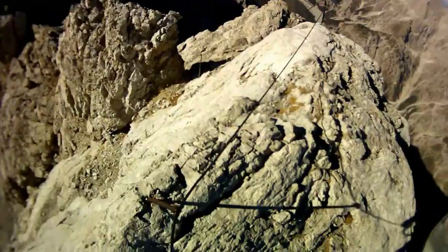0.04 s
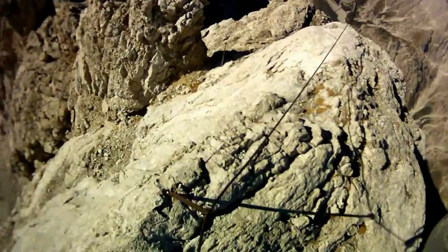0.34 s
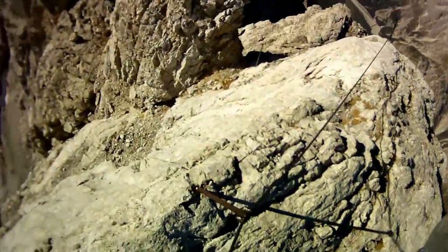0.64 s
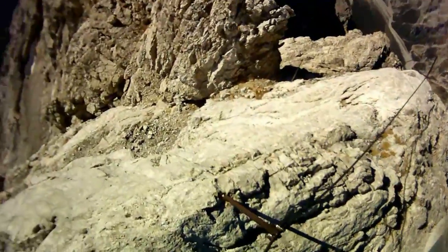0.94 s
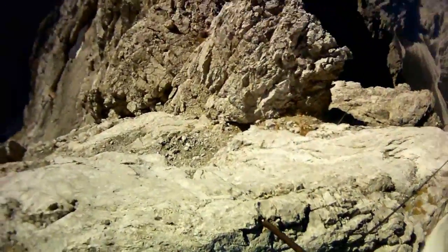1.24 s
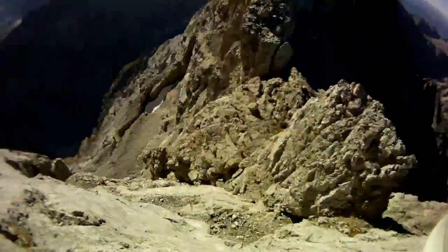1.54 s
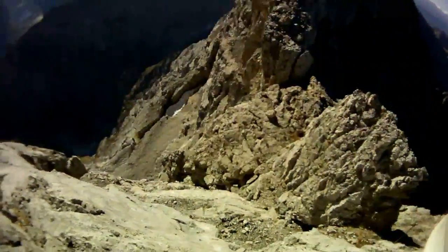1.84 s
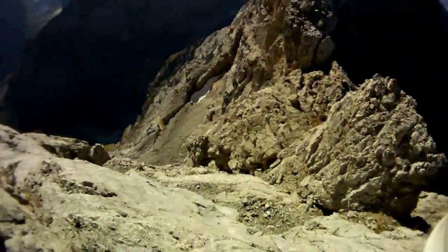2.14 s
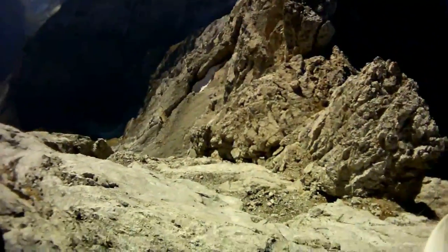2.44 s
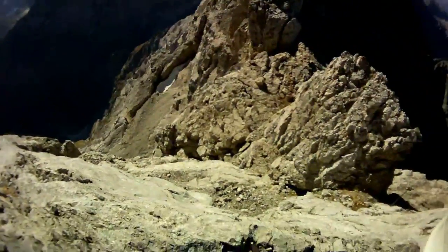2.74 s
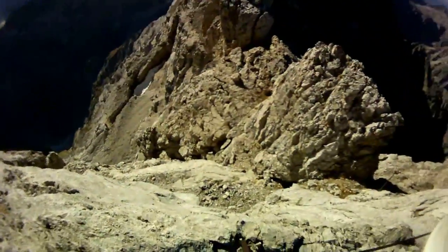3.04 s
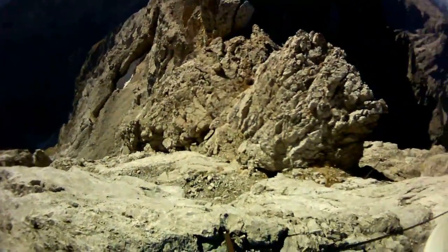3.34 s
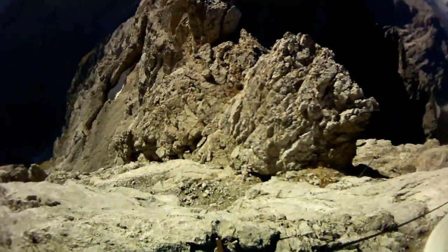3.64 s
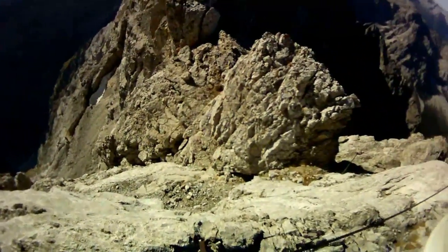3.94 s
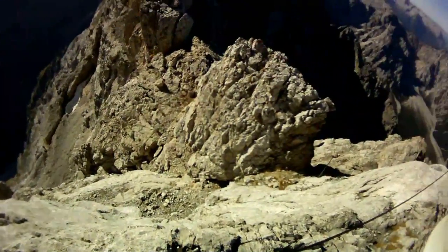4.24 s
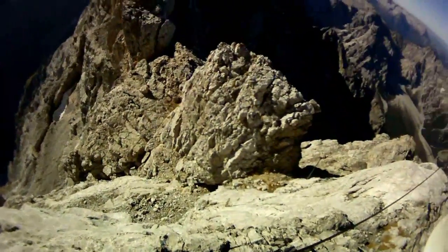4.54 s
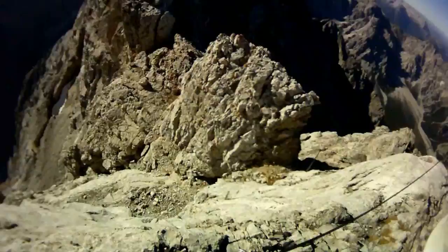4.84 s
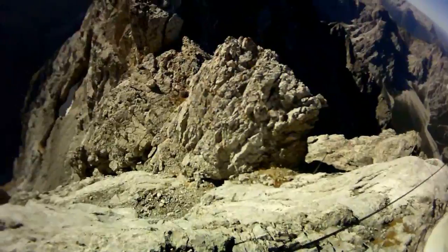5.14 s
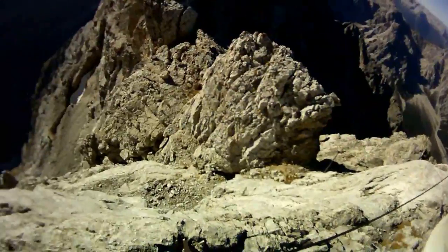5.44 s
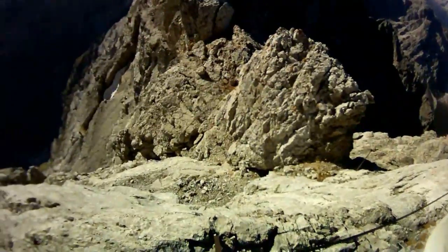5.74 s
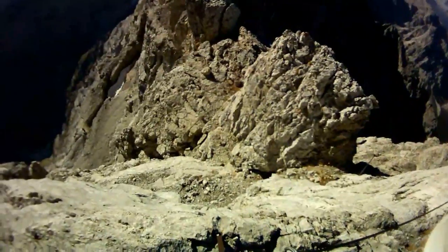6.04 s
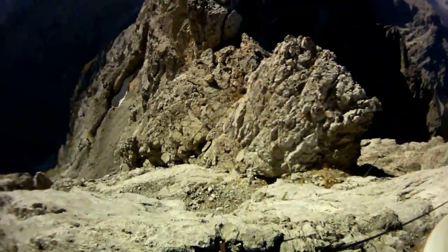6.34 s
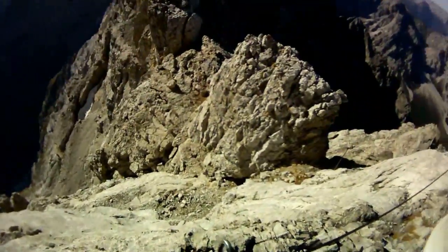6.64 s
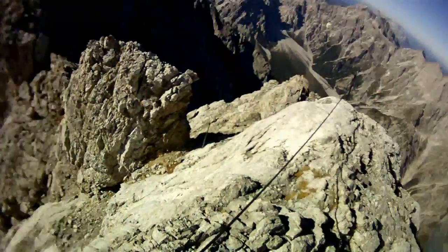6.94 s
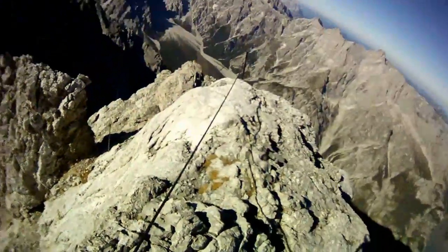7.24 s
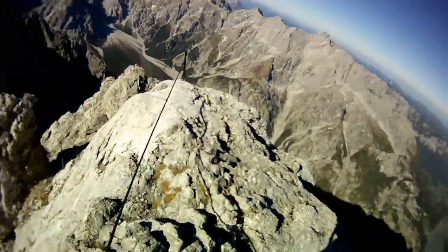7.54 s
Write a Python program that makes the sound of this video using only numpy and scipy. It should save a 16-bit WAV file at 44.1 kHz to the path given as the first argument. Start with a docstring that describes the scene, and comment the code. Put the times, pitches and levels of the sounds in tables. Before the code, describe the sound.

Wind buffets the microphone as carabiners scrape and clank sharply on a steel cable, with scuffs on rock and small gear ticks.

```python
"""A windy limestone ridge, the microphone close on a climber clipped to a fixed steel cable.
From the start gusts buffet the microphone, clothing and soles rustle on the rock and carabiners clank.
After two seconds they scrape along the cable and strike each other and its anchor; near 2.8 s the hardest
clanks overload the recorder. Then the wind eases and the cable hums briefly. From five seconds on,
gear right beside the microphone ticks and creaks as the head turns."""
import sys
import numpy as np
from scipy import signal
from scipy.fft import rfft, irfft, next_fast_len
from scipy.io import wavfile
from scipy.ndimage import uniform_filter1d, minimum_filter1d

SR = 44100
rng = np.random.default_rng(int(sys.argv[2]) if len(sys.argv) > 2 else 0)


def store_pcm(level_fs):
    """Save levels as 16-bit WAV."""
    pcm = np.round(np.clip(level_fs, -1, 1) * 32767).astype(np.int16)
    wavfile.write(sys.argv[1], SR, np.atleast_2d(pcm).T)


N = 339072
T = np.arange(N) / SR
BLOW = T[:SR // 3]   # seconds within one blow


def from_db(db):
    return 10 ** (np.asarray(db) / 20)


def rms_one(x):
    return x / np.sqrt(np.mean(x ** 2) + 1e-20)


def add(out, start, sound):
    """Mix a sound in, start in seconds."""
    at = max(round(start * SR), 0)
    out[at:at + len(sound)] += sound[:N - at]


def drift(per_s):
    """A random wander with rms 1."""
    knots = rng.standard_normal(4096)
    return rms_one(np.interp(T * per_s, np.arange(len(knots)), knots))


def swells(rows, attack_s, release_s):
    """Gain over time: each swell rises, holds and dies away."""
    gain = np.zeros(N)
    for start, length, db in rows:
        rise = np.clip((T - start) / attack_s, 0, 1)
        fall = np.exp(-np.clip((T - start - length) / release_s, 0, 20))
        gain += from_db(db) * rise * fall
    return gain


def coloured(x, spectrum):
    """Causal (minimum-phase) filter through (Hz, dB) points."""
    size = next_fast_len(len(x) + 2048, True)
    hz, db = np.transpose(spectrum)
    bins = np.maximum(np.arange(size // 2 + 1) * SR / size, 1)
    gain = from_db(np.interp(np.log(bins), np.log(hz), db))
    cepstrum = irfft(np.log(gain), size)
    cepstrum[1:size // 2] *= 2
    cepstrum[size // 2 + 1:] = 0
    return irfft(rfft(x, size) * np.exp(rfft(cepstrum)), size)[:len(x)]


def brightened(spectrum, treble_db, shelf_hz=4000):
    """A harder contact lifts the treble like a shelf."""
    return [(hz, db + treble_db / (1 + (shelf_hz / hz) ** 6)) for hz, db in spectrum]


def friction(per_s, spread_db):
    """Tiny slips of uneven size at random moments."""
    sizes = from_db(spread_db * np.minimum(rng.exponential(1, N), 4)) * rng.choice([-1, 1], N)
    return rms_one(sizes * (rng.random(N) < per_s / SR))


def stroke(slips, start, length, spectrum):
    """A short swell of slips heard through a body; rms 1 over its length."""
    count = max(int(length * SR), 64)
    push = slips[int(start * SR):][:count] * signal.windows.tukey(count, .5)
    sound = coloured(np.pad(push, (0, 1024)), spectrum)
    return sound / np.sqrt(np.sum(sound ** 2) / count + 1e-20)


def ringing(modes):
    """Every touch excites each mode with a strength and sign of its own."""
    hz, db, t60 = np.transpose(modes)[:, :, None]
    strength = from_db(db + 3 * rng.standard_normal(hz.shape)) * rng.choice([-1, 1], hz.shape)
    return np.sum(strength * from_db(-60 * BLOW / t60) * np.sin(2 * np.pi * hz * BLOW), axis=0)


# The microphone's hiss in still air. Each row: frequency in Hz, relative level in dB.
HISS_COLOUR = [(18, -27.5), (30, -2), (168, -15), (237, -18), (606, -12), (747, -23), (897, -18),
               (2690, -19), (3590, -28), (5590, -22), (6540, -24), (10700, -21.5), (15500, -26)]
# Tones from the electronics. Each row: frequency in Hz, level in dB.
WHINE_TONES = [(5545, -79), (11090, -72)]


def noise_floor(hiss_db=-65.5):
    """Under everything lie still air, microphone hiss and a thin electronic whine."""
    whine = sum(np.sqrt(2) * from_db(db) * np.sin(2 * np.pi * hz * T) for hz, db in WHINE_TONES)
    hiss = rms_one(coloured(rng.standard_normal(N), HISS_COLOUR))
    return from_db(hiss_db) * hiss + whine


# Gusts crossing the ridge. Each row: time in seconds, relative level in dB.
GUSTS = [(0.0, -41), (0.04, -44), (0.13, -52), (0.43, -46.5), (0.49, -42.5), (0.58, -49), (0.73, -43),
         (1.22, -54), (1.28, -48), (1.95, -53), (2.25, -62.5), (2.55, -66), (2.72, -49), (2.96, -64),
         (3.1, -45), (3.4, -71), (3.66, -56), (3.7, -71), (3.85, -45.5), (3.94, -53), (4.05, -43.5),
         (4.52, -66), (4.63, -58.5), (4.82, -69), (5.01, -56.5), (5.18, -67), (5.42, -60), (5.82, -72.5),
         (6.32, -66.5), (6.42, -69), (6.57, -63.5), (6.64, -74), (7.13, -64), (7.24, -75), (7.58, -75.5),
         (7.69, -65)]
# Wind right on the microphone. Each row: frequency in Hz, relative level in dB.
WIND_COLOUR = [(15, -23.5), (25, 5), (82, -1), (123, -3), (162, -4), (300, -6), (375, -5), (585, -5.5),
               (743, -14.5), (961, -22.5), (1260, -22), (1500, -28), (1950, -61.5), (3300, -120)]


def wind(lumps_db=3, gain_db=2.5, edge_hz=850, bass_hz=130, bass_db=-7, rush_db=-19):
    """Eddies buffet the microphone port in lumps; light air rumbles, strong gusts also rush higher up."""
    gusts = from_db(np.interp(T, *np.transpose(GUSTS)))
    strength = gusts / gusts.max()
    eddies = coloured(rng.standard_normal(N), WIND_COLOUR)
    roar = rms_one(signal.sosfilt(signal.butter(4, edge_hz, fs=SR, output="sos"), eddies))
    bass = signal.sosfilt(signal.butter(1, bass_hz, fs=SR, output="sos"), roar)
    rush = coloured(rng.standard_normal(N), [(400, -20.5), (850, -2), (1500, -7.5), (3000, -30.5)])
    air = from_db(bass_db) * bass * strength ** .68 + (roar - bass) * strength
    air += from_db(rush_db) * rms_one(rush) * strength ** 2
    return gusts.max() * air * from_db(gain_db + lumps_db * drift(per_s=70))


# Rubbed stone and cloth, heard close. Each row: frequency in Hz, relative level in dB.
RUB_COLOUR = [(760, -37), (1300, -11), (2260, -3), (2610, -4), (2980, -1.5), (4350, -2.5), (5790, -9),
              (6750, -5), (9270, -14), (12700, -15), (15000, -26.5)]
# The climber brushing the rock. Each row: start in seconds, length in seconds, level in dB.
RUBS = [(.02, 0.13, -59), (.68, 0.44, -56.5), (1.72, .2, -52.5), (2.17, 0.17, -57), (2.37, 0.077, -49),
        (2.47, .11, -52.5), (2.6, 0.48, -65.5), (3.64, .5, -68.5), (4.2, .09, -63.5)]


def rustle(flutter_db=1.5, stirring_db=-70):
    """Cloth and rubber drag over rough stone; every tiny catch rings briefly at one of many pitches."""
    catches = np.zeros(N)
    for hz in np.geomspace(1500, 14000, 18):
        b, a = signal.iirpeak(hz, Q=13, fs=SR)
        catches += signal.lfilter(b, a, friction(per_s=370, spread_db=2) + 1e-18)
    rubs = swells(RUBS, attack_s=.07, release_s=.036)
    pressure = np.hypot(rubs, from_db(stirring_db))   # clothing stirs between rubs too
    return rms_one(coloured(catches, RUB_COLOUR)) * pressure * from_db(flutter_db * drift(per_s=90))


# Grit cracking down under the soles. Each row: start in seconds, peak level in dB.
CRUNCHES = [(0.7905, -39.5), (1.071, -33), (1.535, -45), (1.9092, -36), (2.387, -40), (2.608, -38.5),
            (3.139, -40), (3.712, -40.5), (3.7588, -41.5), (3.8392, -41), (4.03, -39), (4.1073, -43),
            (4.2593, -38), (4.2826, -40.5), (4.366, -47), (4.4576, -45.5), (4.7923, -39.5)]


def grit(crunch_s=.0057):
    """A grain of stone crumbles in a few milliseconds."""
    out = np.zeros(N)
    for start, db in CRUNCHES:
        crumble = rng.laplace(size=len(BLOW)) * np.exp(-BLOW / crunch_s)
        crunch = coloured(crumble, brightened(RUB_COLOUR, treble_db=7.5))
        add(out, start, from_db(db) * crunch / np.abs(crunch).max())
    return out


# Light touches on the cable. Each row: start in seconds, length in seconds, level in dB.
HUMS = [(4.75, 0.011, -50), (4.86, .14, -56.5)]


def cable_hum(band_hz=(455, 625)):
    """Light handling stirs only the cable's lowest resonance."""
    band = signal.butter(2, band_hz, "band", fs=SR, output="sos")
    hum = rms_one(signal.sosfilt(band, rng.standard_normal(N)))
    return hum * swells(HUMS, attack_s=.011, release_s=.017)


# The gear's hard shell. Each row: frequency in Hz, relative level in dB.
SHELL_COLOUR = [(300, -64), (900, -40), (1700, -14.5), (2400, -6.5), (2800, -8), (3400, 2.5), (4100, 11.5),
                (4700, -1.5), (5500, -9), (7000, -8.5), (8600, -6), (10700, -15), (12600, -3.5),
                (14000, -14), (16000, -51.5)]
# Its ringing. Each row: frequency in Hz, relative level in dB, seconds to fall 60 dB.
SHELL_MODES = [(2454, -6.5, 0.046), (3760, -3, 0.013), (4380, -36, 0.005), (4430, -12, 0.03),
               (8300, -23, 0.012), (12800, -24, .015)]
# Ticks right beside the microphone.
# Each row: start in seconds, relative level in dB, pitch in Hz, treble lift in dB.
TICKS = [(5.076, -21.5, 4000, -6.5), (5.099, -27.5, 3800, -1), (5.4886, -15, 4180, -6.5),
         (5.5973, -36.5, 4500, -9), (6.0287, -15, 4070, 1), (6.2584, -40.5, 3400, 0),
         (6.3096, -27, 3680, 2), (6.313, -31, 3620, 1), (6.3296, -31, 3940, -2), (6.3657, -34.5, 3840, 0),
         (6.386, -33, 3740, -3), (6.412, -40, 3770, 8), (6.421, -25.5, 3930, 22), (6.4509, -19.5, 4400, -7),
         (6.4705, -19.5, 3900, 1), (6.5163, -33.5, 3400, 10), (7.2652, -39, 3780, -4),
         (7.326, -38.5, 4160, 4.5), (7.3431, -36.5, 4420, -7), (7.5025, -32, 3800, -9.5),
         (7.5281, -30, 3920, -12.5), (7.5504, -43, 3750, -9)]
# Creaks, just as close. Each row: start in seconds, length in seconds, level in dB, treble lift in dB.
CREAKS = [(5.52, 0.049, -53.5, -9), (5.556, 0.071, -59, -11), (6.234, 0.052, -60.5, -8),
          (6.366, 0.048, -52, -2), (6.408, 0.041, -50, -19), (6.445, 0.026, -36, 16),
          (7.569, 0.04, -59, -18)]


def gear(shell_hz=3980, snap_s=.00039, rattle_s=.0055, rattle_db=-19, ring_db=-28, tick_gain_db=.5):
    """Stiff gear sticks and slips: single snaps, pitched by where it gives, or a run that creaks."""
    out, slips = np.zeros(N), friction(per_s=800, spread_db=2.5)
    envelope = np.exp(-BLOW / snap_s) + from_db(rattle_db) * np.exp(-BLOW / rattle_s)
    for start, db, pitch_hz, treble_db in TICKS:
        tuning = pitch_hz / shell_hz
        force = rng.standard_normal(len(BLOW)) * envelope
        force[0] = 1.8   # the opening click
        snap = coloured(force, brightened(np.multiply(SHELL_COLOUR, [tuning, 1]), treble_db))
        ring = from_db(ring_db) * ringing(np.multiply(SHELL_MODES, [tuning, 1, 1]))
        add(out, start, from_db(db + tick_gain_db) * (snap / np.abs(snap).max() + ring))
    for start, length, db, treble_db in CREAKS:
        creak = stroke(slips, start, length, brightened(SHELL_COLOUR, treble_db))
        add(out, start, from_db(db) * creak)
    return out


# Steel on steel at close range. Each row: frequency in Hz, relative level in dB.
STEEL_COLOUR = [(250, -45), (420, -25), (520, -11), (740, -18.5), (1020, -11.5), (1220, -12), (1600, -7.5),
                (2350, -2), (2950, -3), (3250, -11), (5500, -12.5), (7500, -27.5), (10500, -28.5),
                (15000, -47)]
# The cable and its anchor. Each row: frequency in Hz, relative level in dB, seconds to fall 60 dB.
CABLE_MODES = [(527.6, -31, 0.12), (980, -19.5, 0.046), (1069, -23.5, 0.078), (1384, -26, 0.047),
               (1450, -20.5, .045), (1730, -22, 0.059), (1935, -25.5, 0.032), (2284, -22.5, .045),
               (2320, -23, 0.042), (2680, -20.5, 0.066), (3020, -22, .07), (3800, -32.5, 0.038),
               (4520, -35, 0.043), (5500, -33, 0.032)]
# A carabiner sliding nearby. Each row: start in seconds, length in seconds, rasp level in dB.
SLIDES = [(2.301, 0.016, -55), (2.397, 0.044, -53), (2.433, 0.025, -43.5), (2.502, 0.036, -42),
          (2.693, 0.055, -43.5), (2.746, 0.032, -32), (2.774, 0.014, -27), (2.818, 0.0087, -26.5),
          (2.833, .025, -52), (2.8554, 0.017, -36.5), (2.874, .022, -40), (2.97, 0.0084, -45),
          (2.992, 0.068, -51), (3.365, 0.16, -56.5)]


def carabiner_slides(middling_db=-44.5, ring_db=-5):
    """A carabiner rasps over the twisted wires and keeps the cable ringing softly."""
    out, slips = np.zeros(N), friction(per_s=2800, spread_db=2.5)
    for start, length, db in SLIDES:
        treble_db = 3 + .25 * (db - middling_db)   # a faster slide is louder and brighter
        rasp = stroke(slips, start, length, brightened(STEEL_COLOUR, treble_db))
        drag = stroke(slips, start, length, [(1000, 3.5), (2500, -12)])
        ring = signal.fftconvolve(drag, ringing(CABLE_MODES))
        ring *= np.linalg.norm(rasp) / np.linalg.norm(ring)
        add(out, start, from_db(db) * rasp)
        add(out, start, from_db(db + ring_db) * ring)
    return out


# A struck carabiner. Each row: frequency in Hz, relative level in dB, seconds to fall 60 dB.
CARABINER_MODES = [(2664, 2, 0.02), (2791, -5, .03), (2870, 0, 0.041), (2955, -14.5, 0.023),
                   (3700, -15.5, 0.019), (4160, -23.5, .04), (5407, -18, 0.028), (5650, -14, 0.028),
                   (6260, -27.5, .07), (7060, -30, 0.035), (8724, -36.5, 0.034)]
# Blows within reach of the microphone. Each row: start in seconds, then crack level,
# carabiner ring peak, cable ring gain and treble lift, all in dB.
CLANKS = [(0.0742, -42.5, -32.5, -28, -12), (0.0982, -45, -44, -19, -3), (.627, -46, -39.5, -28.5, -7),
          (0.6401, -32, -23, -34.5, -21), (1.7435, -29.5, -36, -18, 11), (2.0557, -36, -25, -20, 16),
          (2.0768, -42, -53, -26, -5), (2.713, -33.5, -57, -39, 1), (2.7383, -19, -15.5, -19, -1),
          (2.7455, -15, -20.5, -21, -2.5), (2.7497, -20.5, -25, -27, -2.5), (2.7885, -1.5, 2, -6, 7.5),
          (2.794, -4.5, -12, -18.5, 5), (2.801, -8.5, -16, -15, 10), (2.810, -22.5, -30, -27.5, 8),
          (2.8178, -2, -5, -17, 12), (2.884, -26, -42, -25, -14), (3.4084, -48.5, -53, -39, 1.5),
          (3.457, -34.5, -56, -43, -27), (3.473, -35.5, -40.5, -36, -23), (3.4938, -13.5, -6, -17, -3),
          (3.503, -26, -23, -20, -10), (3.509, -23.5, -20, -25, -9), (3.516, -27.5, -19, -37, -14),
          (3.5254, -20, -16, -17.5, -14), (3.5367, -26.5, -35, -17.5, -8), (3.5691, -39.5, -33, -39, -31)]


def carabiner_clanks(contact_s=.0024, halving_db=18.5, buzz_db=-27, buzz_s=.008, build_s=.0004):
    """Chattering contacts crack and the strands buzz briefly; cable and carabiner ring on."""
    out, attack = np.zeros(N), SR // 250   # the first 4 ms set a crack's level
    buzz = from_db(buzz_db) * np.exp(-BLOW / buzz_s)
    for start, crack_db, ring_db, cable_db, treble_db in CLANKS:
        decay_s = contact_s * .5 ** (treble_db / halving_db)   # brighter blows are shorter
        chatter = rng.standard_normal(len(BLOW)) * (np.exp(-BLOW / decay_s) + buzz)
        crack = coloured(chatter, brightened(STEEL_COLOUR, treble_db))
        ring = ringing(CARABINER_MODES) * (1 - np.exp(-BLOW / build_s))
        add(out, start, from_db(crack_db) * crack / np.std(crack[:attack]))
        add(out, start, from_db(ring_db) * ring / np.abs(ring).max())
        add(out, start, from_db(cable_db) * ringing(CABLE_MODES))
    return out


def scene():
    """One microphone, everything close and in the open air, so there is no room sound."""
    steel = carabiner_clanks() + carabiner_slides() + cable_hum()
    return (steel + gear() + grit() + rustle() + wind() + noise_floor())[None]


def record(dry, hold_s=.0012, ceiling=1.1, overload=.97, cutoff_hz=15500):
    """The recorder's fast limiter holds the hardest clanks down; peaks clip flat and the top is cut."""
    span = int(hold_s * SR)
    gain = np.minimum(1, ceiling / (np.abs(dry) + 1e-9))
    held = minimum_filter1d(gain, span)
    limited = dry * uniform_filter1d(held, span)
    lowpass = signal.ellip(10, .1, 70, cutoff_hz, fs=SR, output="sos")
    return signal.sosfilt(lowpass, np.clip(limited, -overload, overload))


dry = scene()
out = record(dry)
store_pcm(out)
```